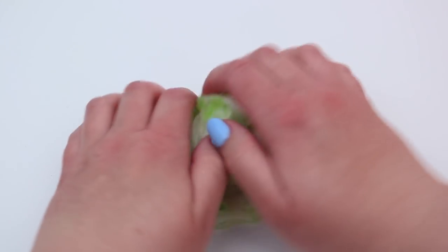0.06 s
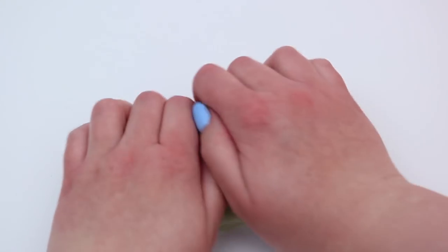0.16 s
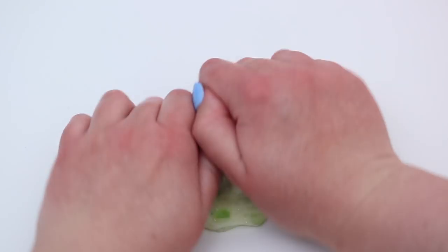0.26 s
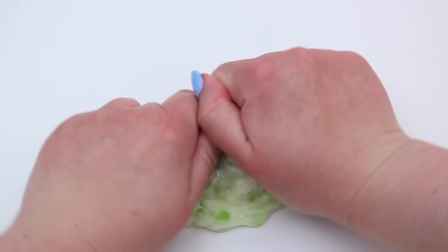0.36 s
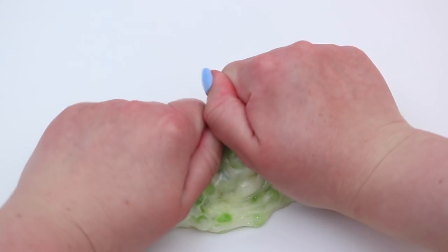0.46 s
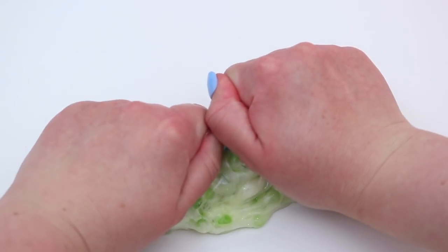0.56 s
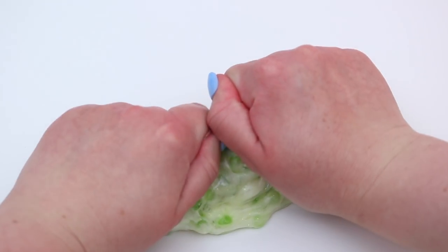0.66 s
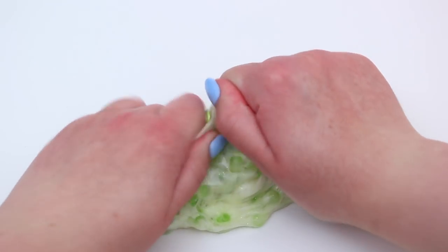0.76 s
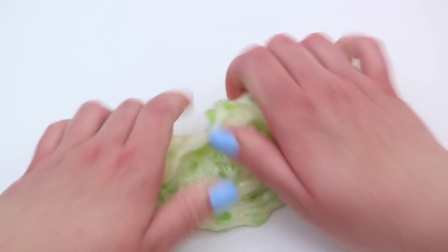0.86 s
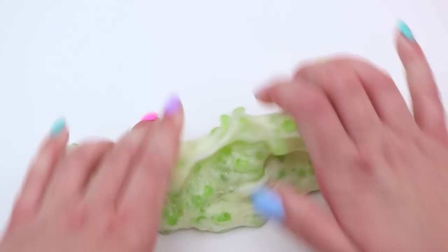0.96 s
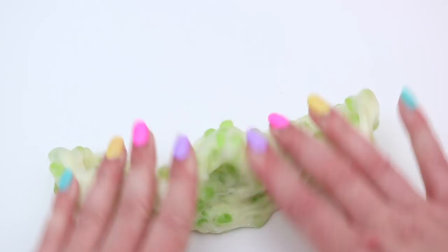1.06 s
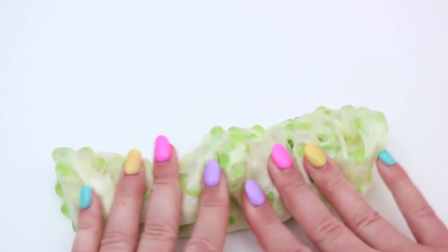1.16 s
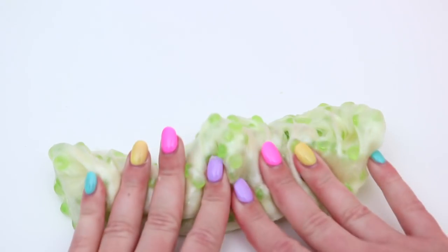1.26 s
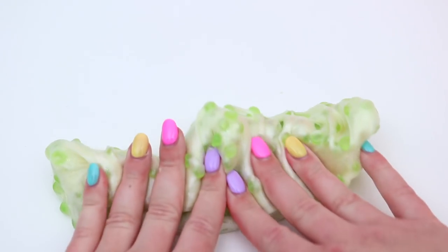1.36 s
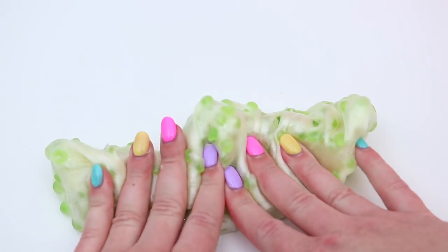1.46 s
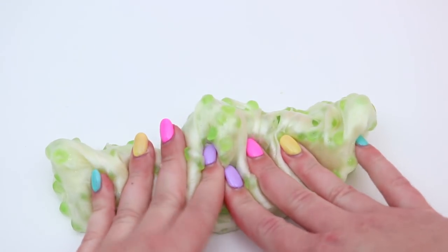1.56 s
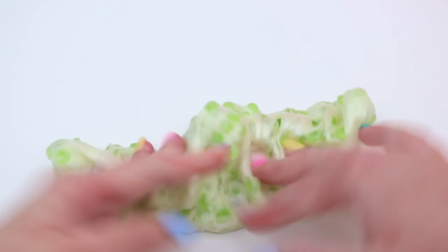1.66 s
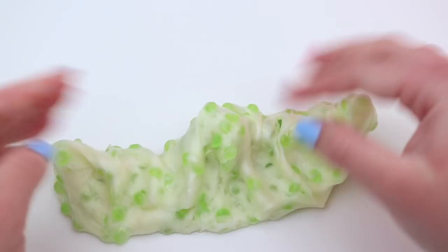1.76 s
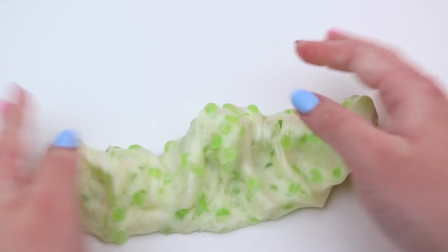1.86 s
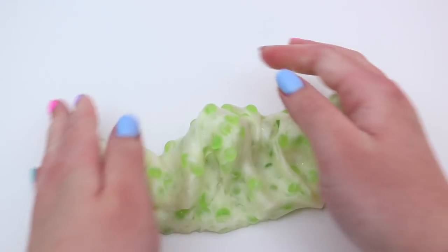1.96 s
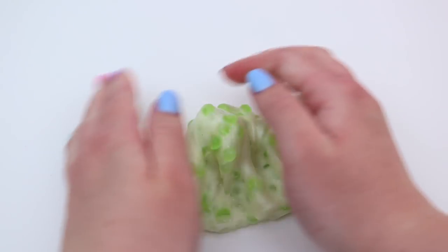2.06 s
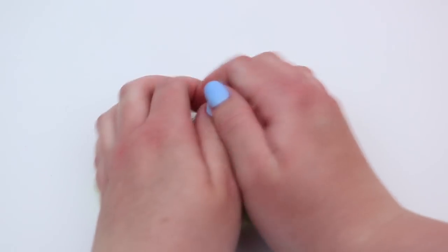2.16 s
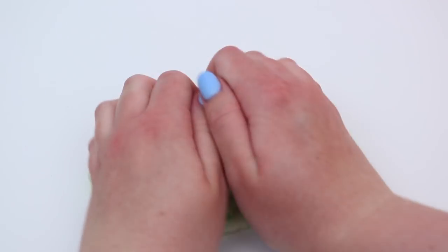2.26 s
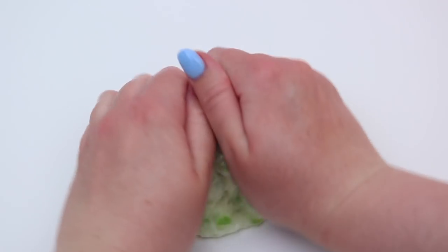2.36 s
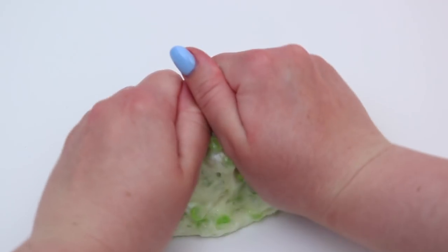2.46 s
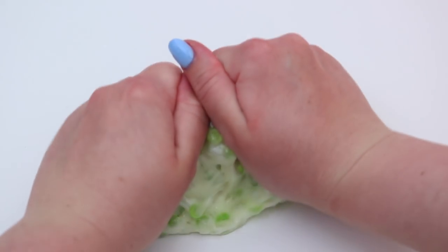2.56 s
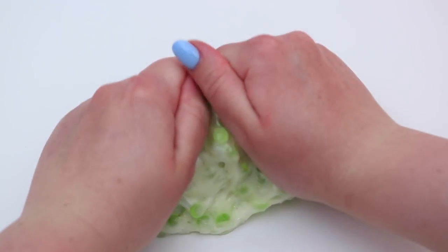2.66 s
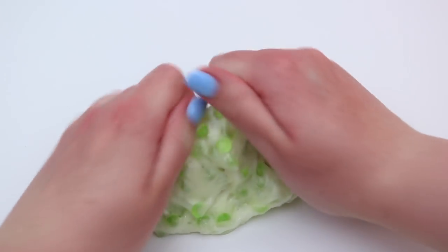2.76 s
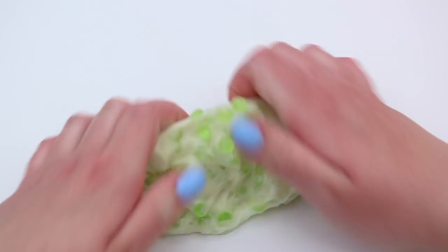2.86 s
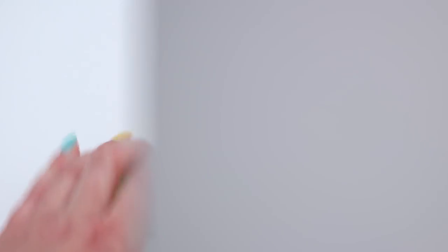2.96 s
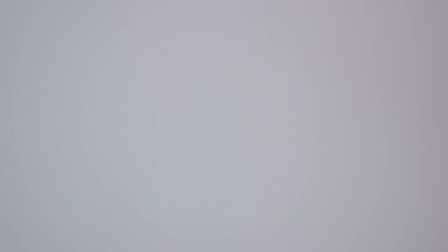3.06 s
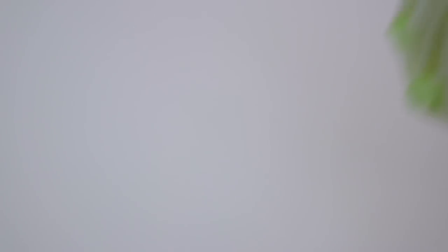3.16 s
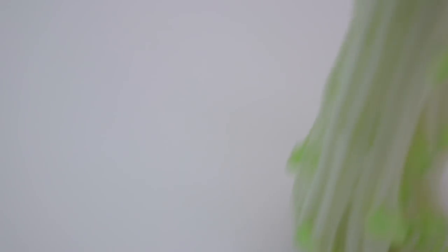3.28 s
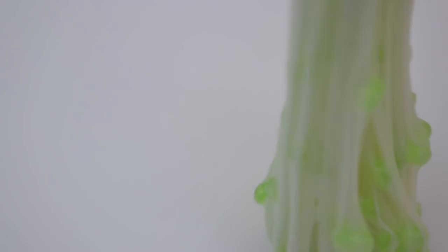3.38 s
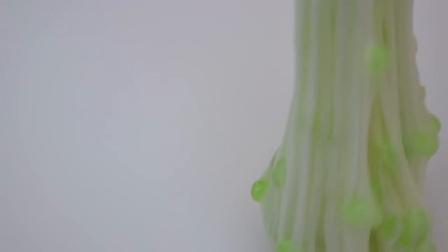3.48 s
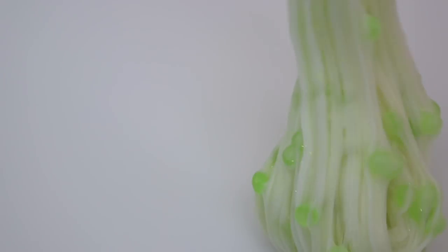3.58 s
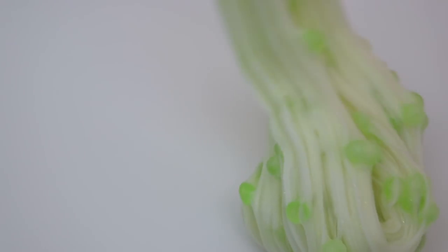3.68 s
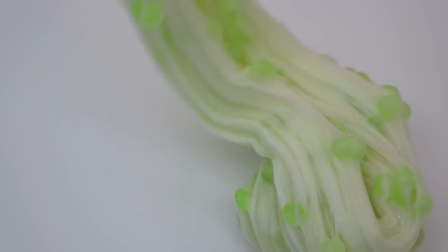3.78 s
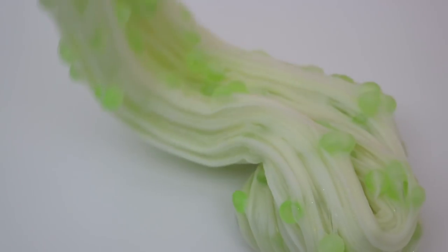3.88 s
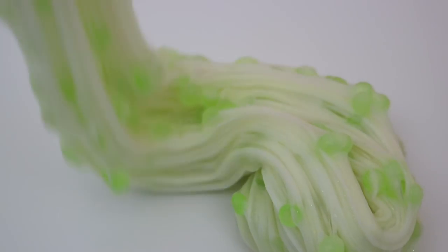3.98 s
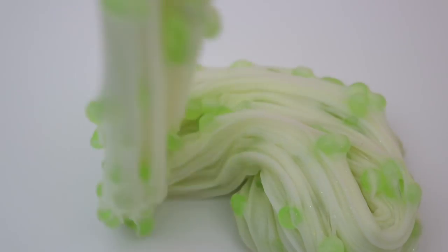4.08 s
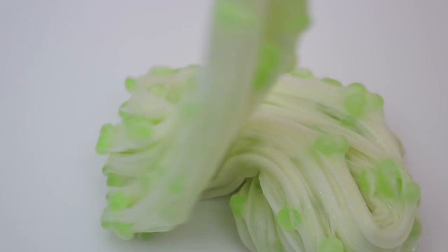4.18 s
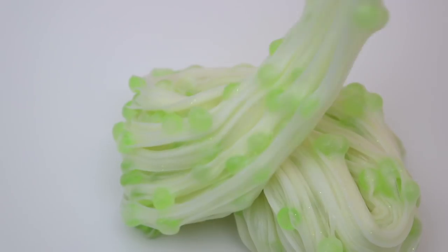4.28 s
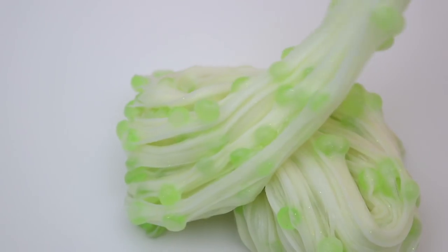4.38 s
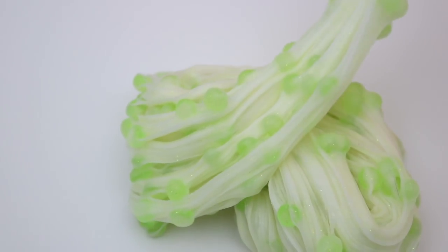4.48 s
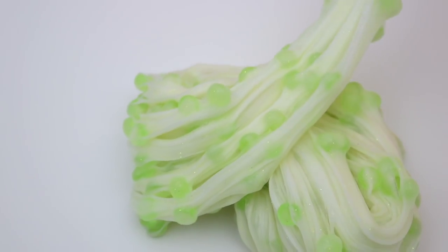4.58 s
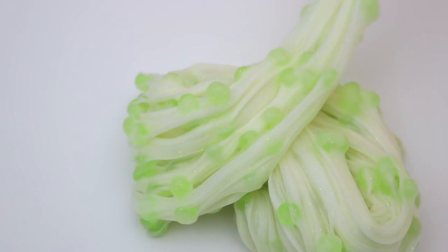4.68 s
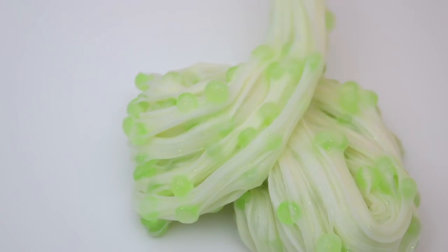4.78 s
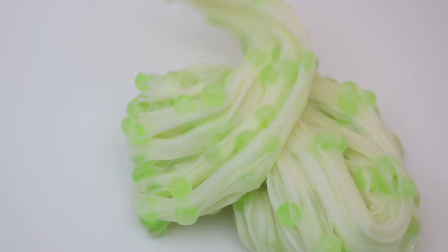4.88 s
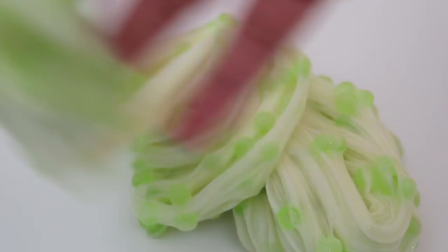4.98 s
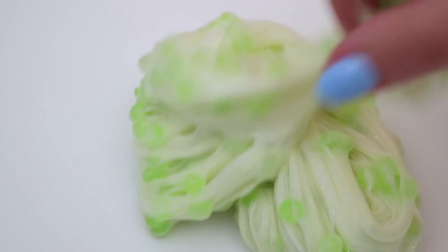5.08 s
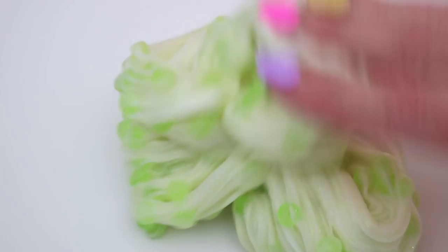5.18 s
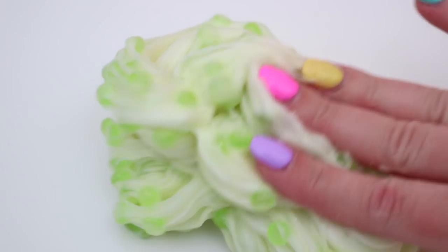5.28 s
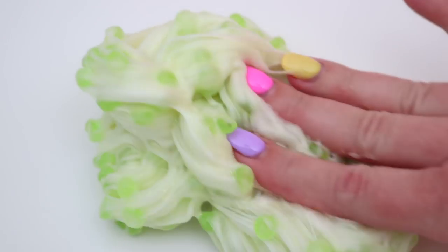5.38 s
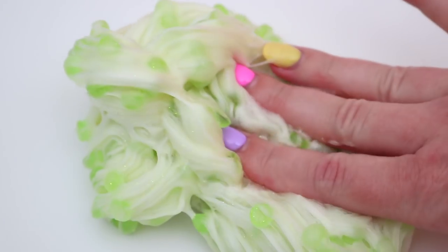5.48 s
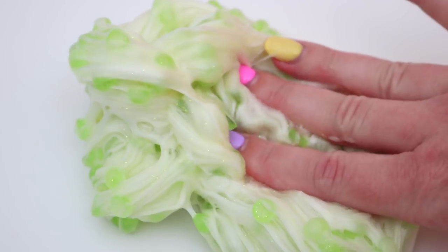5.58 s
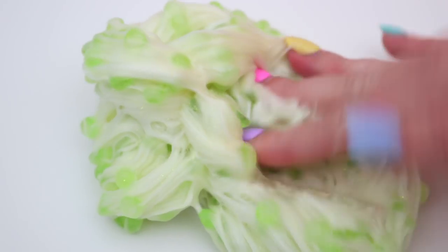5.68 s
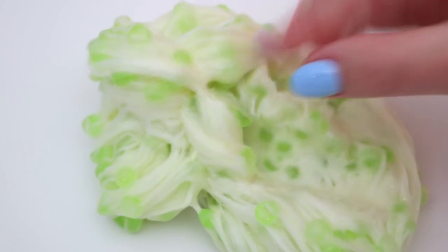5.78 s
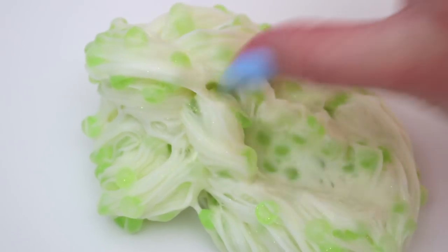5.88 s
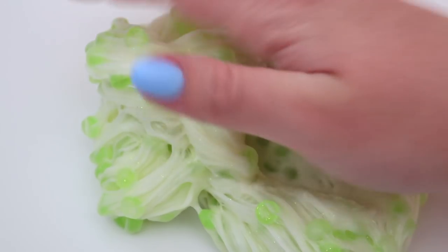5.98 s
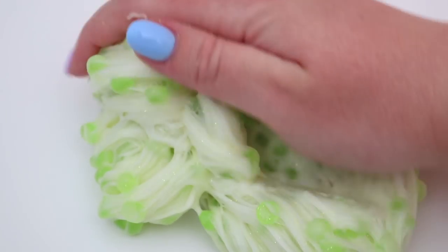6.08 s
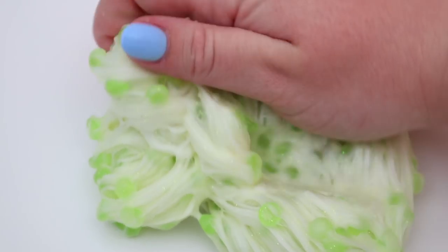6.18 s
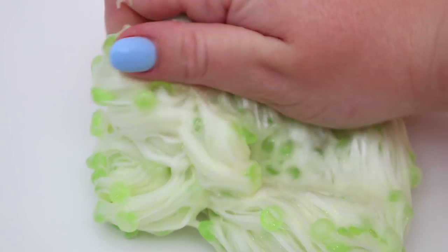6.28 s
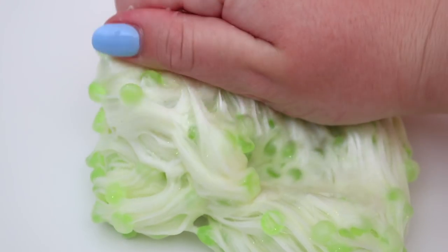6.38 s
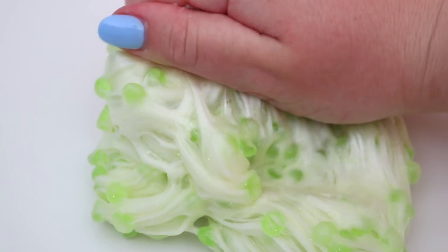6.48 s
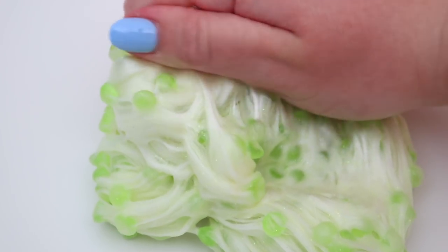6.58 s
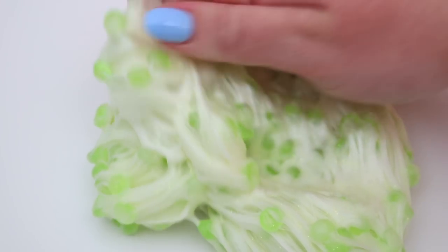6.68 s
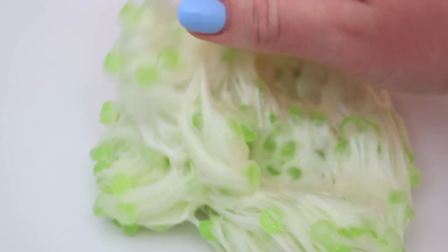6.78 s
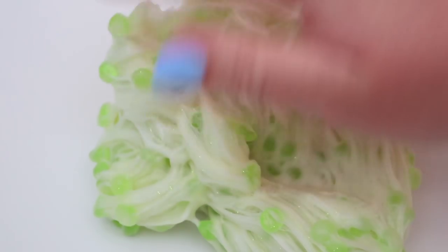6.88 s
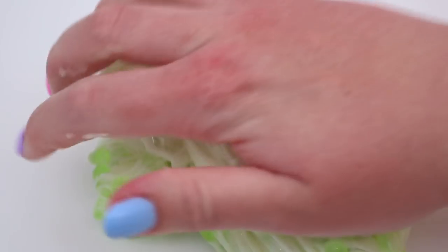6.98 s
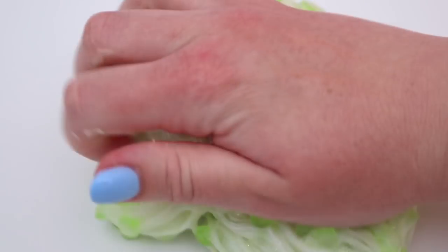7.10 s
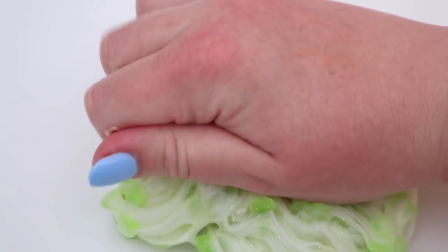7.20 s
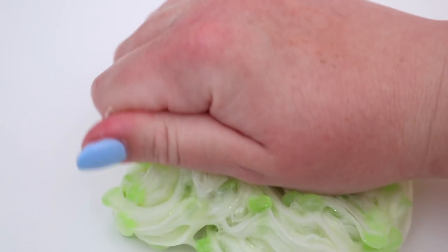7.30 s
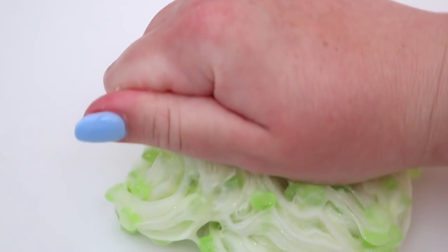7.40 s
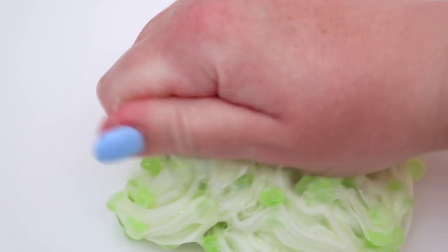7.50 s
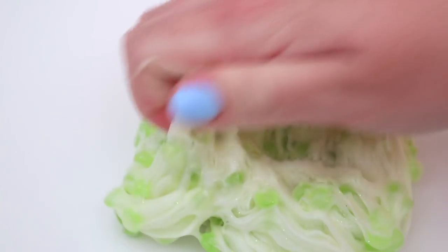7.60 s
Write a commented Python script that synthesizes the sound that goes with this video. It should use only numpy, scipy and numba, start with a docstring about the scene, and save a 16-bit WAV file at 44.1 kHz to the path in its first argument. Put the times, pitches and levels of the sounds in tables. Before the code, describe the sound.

Bead-filled slime is kneaded on a table, heard very close and dry in a small quiet room with low steady room tone. From 0.1 to 0.65 s a thick run of sharp pops and bright snaps crackles out, followed by a plop and a sticky peel with a soft table thump around 0.7-0.95 s. Fainter ticks and light rustling continue from 1.1 to 1.7 s, ending in a small peel. At 2.1 s light crackle builds to a short crisp cluster at 2.4-2.65 s, then sticky tearing until 3 s. From 3 to 5 s only sparse, faint ticks remain. Soft pops and wet plops return at 5.2-5.9 s. The loudest, densest crunch bursts at 6.2-6.6 s, with a peel and low thump after. A final squelchy, popping squeeze at 7.1-7.45 s ends in a sticky peel and deep table boom near 7.6 s.

```python
"""Hands knead bead-filled slime on a table, heard close in a small quiet room with steady room tone.
0.1-0.9 s: a thick run of pops, then a few fainter ones; 2.1-2.7 s: a short cluster; 3-5 s: sparse, faint.
5.2-5.9 s: pops return; 6.1-6.6 s: the loudest cluster; 7.1-7.5 s: one more, then a peel and a table boom.
Pops and their strong close echoes are damped-sine grains, the tearing film is dense random grains,
the pressed table top is a set of resonances; fainter echoes and a short tail follow the slime sounds."""
import sys
import numpy as np
from scipy import signal
from scipy.fft import rfft, irfft
from scipy.io import wavfile
from scipy.ndimage import uniform_filter1d, minimum_filter1d
from numba import njit

SR = 44100
rng = np.random.default_rng(int(sys.argv[2]) if len(sys.argv) > 2 else 0)


def wav_out(sig):
    """Save sig, one row per channel (or a flat mono array), as 16-bit PCM at SR to the path in sys.argv[1]."""
    wavfile.write(sys.argv[1], SR, np.round(np.clip(np.atleast_2d(sig).T, -1, 1) * 32767).astype(np.int16))


N = 336924


def undb(db):
    """dB to amplitude gain."""
    return 10 ** (np.asarray(db) / 20)


def level(x, rms_db):
    """Scale to the given rms level."""
    return x * undb(rms_db) / np.sqrt(np.mean(x ** 2))


def band(x, hz, width_hz):
    """Resonance with gain 1 at the centre."""
    b, a = signal.iirpeak(hz, hz / width_hz, fs=SR)
    return signal.lfilter(b, a, x)


def highpass(x, order, hz):
    """Butterworth bass cut."""
    return signal.sosfilt(signal.butter(order, hz, "high", fs=SR, output="sos"), x)


@njit
def grains(size, at, hz, cycles, peak, phase, rise, glide):
    """Damped sines that swell and die within the given cycles; peak is the top of each envelope."""
    out = np.zeros(size)
    for k in range(len(at)):
        length = cycles[k] * SR / hz[k]
        top = rise * length
        for i in range(min(int(length), size - at[k])):
            x = (i + 1) / top
            envelope = (x * np.exp(1 - x)) ** 2
            bend = 1 + glide[k] * i / length / 2  # pitch shifts by the share glide over the grain
            out[at[k] + i] += peak[k] * envelope * np.sin(phase[k] + 2 * np.pi * hz[k] * i / SR * bend)
    return out


def burst(s, hz, cycles, peak_db, glide=0.):
    """Grains of chance phase, started early so that they crest near the times s."""
    start_s = s - 0.079 * cycles / hz
    at = np.clip(start_s * SR, 0, N - 1).astype(np.int64)
    phase = 2 * np.pi * rng.random(len(s))
    return grains(N, at, np.clip(hz, 50, .4 * SR), cycles + 0 * hz, undb(peak_db), phase,
                  0.087, glide + 0 * hz)


def crackle(rate_hz, lo_hz, hi_hz, cycles, spread_db, bend=0.):
    """Countless grains at chance moments and pitches, a few larger; rms 1."""
    when, pitch, size, slide = rng.random((int(rate_hz * N / SR), 4)).T
    hz = lo_hz * (hi_hz / lo_hz) ** pitch
    db = np.minimum(-spread_db * np.log(1 - size), 4.25 * spread_db)
    return level(burst(when * N / SR, hz, cycles, db, bend * (2 * slide - 1)), 0)


# room tone spectrum: f/Hz, relative density/dB per Hz
AIR = [(25, -1), (60, 0.5), (121, -7.5), (187, 4.5), (330, -9.5), (746, -10.5), (979, 0), (1220, -6.5),
       (1600, -9), (2530, -27), (3600, -28), (14800, -23.5), (16500, -40)]
AIR_RMS_DB = -68.5


def air():
    """Steady room tone: noise shaped in the spectrum."""
    hz, db = np.transpose(AIR)
    f = np.maximum(np.arange(N // 2 + 1) * SR / N, 1)
    gain = undb(np.interp(np.log(f), np.log(hz), db))
    return level(irfft(rfft(rng.standard_normal(N)) * gain, N), AIR_RMS_DB)


# close echoes: delay/ms, level/dB re direct
ECHOES = [(.8, -24.5), (1.5, -11.5), (2.1, -4.5), (3.8, -22), (11.5, -27.5), (14.5, -27)]
# room tail bands: f/Hz, T60/s, level/dB (energy weighted by f)
ROOM_T60 = [(744, 0.25, -35), (2800, 0.21, -28), (9000, 0.14, -29.5)]


def reply():
    """Direct sound, close echoes smeared by rough surfaces, then a faint tail, shorter in the treble."""
    t = np.arange(SR // 4) / SR
    out = np.zeros(len(t))
    out[0] = 1
    for ms, db in ECHOES:
        smear = rng.standard_normal(len(t)) * np.exp(-np.abs(t * 1000 - ms) / 0.1)
        out += undb(db) * smear / np.sqrt(np.sum(smear ** 2))
    for hz, t60_s, db in ROOM_T60:
        decay = np.exp(-np.log(1000) * t / t60_s)
        tail = band(rng.standard_normal(len(t)), hz, 2.4 * hz) * decay * (t > .001)
        out += undb(db) * tail / np.sqrt(np.sum(tail ** 2) * hz / SR)
    return out


def room(x, spots=6, size=700):
    """Pockets burst all over the lump: each run of samples meets the echoes of a random spot."""
    spot = np.repeat(rng.integers(0, spots, N // size + 1), size)[:N]
    return sum(signal.oaconvolve(x * (spot == k), reply())[:N] for k in range(spots))


def gesture(rows, arch_db, rise_db_per_s, fall_db_per_s):
    """Arched power of crackle and table that dies away outside each gesture; overlaps add."""
    t, power = np.arange(N) / SR, 0
    for start, swell, fade, *crest_db in rows:
        corners_s = [-1, 0, swell, swell + fade, swell + fade + 1]
        corners_db = [-arch_db - rise_db_per_s, -arch_db, 0, -arch_db, -arch_db - fall_db_per_s]
        shape_db = np.interp(t - start, corners_s, corners_db)
        power = power + undb(shape_db + np.array(crest_db)[:, None]) ** 2
    return power


# weight resting on slime and table: t/s, wet rustle/dB, fine rustle/dB, table/dB, table bass/dB
LEAN = [(0, -78, -72.5, -64, -78), (.16, -61, -67.5, -65, -77), (1.05, -62.5, -62, -54.5, -70.5),
        (1.498, -72, -69, -64.5, -79), (1.9, -83, -92, -72, -75), (2.0, -71.5, -70, -63, -68),
        (2.99, -58, -59.5, -61, -75.5), (3.04, -82, -89.5, -78.5, -82.5), (5.1, -81.5, -83, -74.5, -78),
        (5.5, -57, -91, -56, -81.5), (5.66, -90, -88, -72.5, -85), (6, -71.5, -76.5, -67.5, -65.5),
        (6.65, -57, -59.5, -55.5, -74.5), (6.9, -73, -73, -67, -64), (7.1, -64.5, -77, -68, -76),
        (7.5, -61, -80, -80, -81), (7.64, -63, -66, -60, -72)]
# hands shift their weight, table booms: t/s, level/dB
BOOMS = [(.03, -59), (.96, -50), (1.27, -58), (1.779, -54.5), (5.74, -62.5), (5.9, -50), (6.69, -61),
         (6.82, -47.5), (7.16, -54.5), (7.64, -38)]
BOOM_DB_PER_S = 232  # slope on both sides
# hands press into the slime: start/s, swell/s, fade/s, wet crackle/dB, fine crackle/dB, table/dB
SQUEEZES = [(.21, 0.082, 0.21, -46.5, -48.5, -51), (.36, 0.031, 0.11, -38.5, -39, -47),
            (.53, 0.065, 0.048, -52, -48.5, -68), (1.22, 0.052, 0.087, -65.5, -74.5, -60),
            (1.36, 0.021, 0.055, -62, -66, -59), (2.085, 0.021, 0.13, -51.5, -56, -50.5),
            (2.305, 0.16, 0.1, -45.5, -49, -48), (2.495, 0.021, 0.026, -35, -45, -55.5),
            (2.585, 0.016, 0.041, -39.5, -39, -52), (4.72, 0.04, 0.027, -69, -67, -75),
            (5.27, 0.13, 0.29, -75, -76, -67.5), (6.13, 0.12, 0.067, -55, -54.5, -54),
            (6.25, 0.022, 0.081, -40, -43.5, -46), (6.34, 0.069, 0.047, -30.5, -27.5, -56),
            (6.48, 0.02, 0.04, -57, -45, -62.5), (6.555, 0.017, 0.043, -53.5, -41.5, -71),
            (7.145, 0.014, 0.034, -47.5, -47.5, -49), (7.215, 0.045, 0.1, -38.5, -37.5, -43),
            (7.297, 0.019, 0.064, -32, -34, -40), (7.39, 0.012, 0.05, -42, -43.5, -45)]
SQUEEZE_ARCH_DB, SQUEEZE_RISE_DB_PER_S, SQUEEZE_FALL_DB_PER_S = 8, 598.5, 263
# sticky skin peels off: start/s, swell/s, fade/s, wet crackle/dB, fine crackle/dB, table/dB
PEELS = [(0.799, 0.054, 0.11, -37.5, -39.5, -37.5), (1.652, 0.064, 0.082, -49.5, -45.5, -39),
         (2.78, 0.046, 0.097, -40.5, -43.5, -42), (2.9, 0.083, 0.036, -64, -54.5, -49),
         (5.72, 0.015, 0.038, -44.5, -46.5, -40), (5.81, 0.012, 0.075, -54, -47, -43),
         (6.668, 0.053, 0.12, -40, -39.5, -40.5), (7.555, 0.036, 0.13, -41.5, -43.5, -37.5)]
PEEL_ARCH_DB, PEEL_RISE_DB_PER_S, PEEL_FALL_DB_PER_S = 14.5, 381, 387
REST_WET_DB, REST_FINE_DB = -85, -90.5  # the lump settles by itself


def hands():
    """Powers of all hand moves add: (wet, fine) gains of sparse and dense crackle, table and bass in dB."""
    t = np.arange(N) / SR
    squeeze = gesture(SQUEEZES, SQUEEZE_ARCH_DB, SQUEEZE_RISE_DB_PER_S, SQUEEZE_FALL_DB_PER_S)
    peel = gesture(PEELS, PEEL_ARCH_DB, PEEL_RISE_DB_PER_S, PEEL_FALL_DB_PER_S)
    s, *columns = np.transpose(LEAN)
    lean = undb([np.interp(t, s, db) for db in columns]) ** 2
    booms = sum(undb(db - BOOM_DB_PER_S * np.abs(t - at)) ** 2 for at, db in BOOMS)
    rest = undb([[REST_WET_DB], [REST_FINE_DB]]) ** 2
    sparse = np.sqrt(squeeze[:2] + rest)
    dense = np.sqrt(peel[:2] + lean[:2])
    push_db = 10 * np.log10(squeeze[2] + peel[2] + lean[2])
    bass_db = 10 * np.log10(booms + lean[3])
    return sparse, dense, push_db, bass_db


# table top modes: f/Hz, width/Hz at damp 1, level/dB
TABLE = [(132, 27, -10), (195.5, 16, -6.5), (285, 20, 3.5), (363.9, 19, 5.5), (460, 23, -5), (505, 51, -2),
         (600, 65, -2)]


def table_modes(x, damp=1.3):
    """Modes of the table top; a pressing hand damps them, a light knock lets them ring."""
    return sum(undb(db) * band(x, hz, damp * width_hz) for hz, width_hz, db in TABLE)


# wet plops and low thuds of pops, ringing the table: t/s, level/dB, f/Hz, knock/dB re level
PLOPS_AND_THUDS = [(0.713, -29.5, 660, 21), (0.799, -40, 318, 14), (0.857, -36, 340, 4),
                   (.875, -34, 207, 2), (1.1039, -37, 418, 14), (1.685, -39.5, 353, 13.5),
                   (1.952, -51, 282, 8), (3.364, -50, 329, 8.5), (5.324, -33.5, 610, 2),
                   (5.369, -41.5, 560, 2), (5.525, -54, 310, 10), (5.566, -47, 326, 7),
                   (5.738, -39, 292, 13.5), (5.835, -39.5, 326, 17), (6.256, -30, 227, 13),
                   (7.227, -31.5, 320, 11), (7.296, -21, 474, 11)]
SAG = -0.44  # share of pitch lost over the lowest grain


def plops_and_thuds():
    """Two steady upper grains and a slightly later low one that sags in pitch."""
    s, db, hz, _ = np.transpose(PLOPS_AND_THUDS)
    low = burst(s + 0.0021, hz, 14.1, db - 1.0, SAG)
    mid = burst(s, 1.3 * hz, 14.0, db + 0.5)
    high = burst(s, 5.1 * hz, 15.6, db - 21.0)
    return low + mid + high


def table(push_db, bass_db, jolts):
    """Uneven pushes of the hands, wet plops, low thuds and the jolts of the pops ring the table top."""
    s, db, hz, knock_db = np.transpose(PLOPS_AND_THUDS)
    pushes = crackle(700, 150, 820, 9.0, 2.1, bend=0.51)  # wet blobs that slide up or down
    top = level(table_modes(pushes) + undb(-11.0) * pushes, 0)
    bass = level(band(band(rng.standard_normal(N), 61, 16), 67, 26), 0)
    knocks = burst(s, hz, 3.5, db + knock_db)
    struck = table_modes(knocks + undb(-4.0) * jolts, 0.36)
    return undb(push_db) * top + undb(bass_db) * bass + plops_and_thuds() + struck


def lumps(spread_db, size=400):
    """Threads let go in bunches: a gain that jumps about a hundred times a second."""
    steps = np.repeat(rng.standard_normal(N // size + 1), size)
    db = spread_db * uniform_filter1d(steps, size // 3)[:N]
    return level(undb(db), 0)


def ticks(rate_hz=450, spread_db=4.5, own_db=4.0):
    """Beads slip and small pockets burst singly: low and high grain together, each pair of its own colour."""
    when, size, low, high, tilt = rng.random((int(rate_hz * N / SR), 5)).T
    s = when * N / SR
    db = np.minimum(-spread_db * np.log(1 - size), 13.0)
    tilt_db = own_db * (2 * tilt - 1)
    return (level(burst(s, 1100 * 5.9 ** low, 6.5, db + tilt_db), 0),
            level(burst(s, 5500 * 2.8 ** high, 4.8, db - tilt_db), 0))


def film(sparse, dense):
    """Squeezing gives separate ticks; peeling skin tears many threads at once, a dense wet rustle."""
    low, high = ticks()
    wet = dense[0] * lumps(3.0) * crackle(5000, 870, 6000, 6.5, 5.5) + sparse[0] * low
    fine = dense[1] * lumps(0.5) * crackle(9000, 4862, 16000, 2.9, 4.8) + sparse[1] * high
    return wet + fine


# bursting pockets, some followed about 2 ms later by a strong close echo (a row of its own):
# t/s, ring f/Hz, ring level/dB, snap f/Hz, snap level/dB
POPS = [(0.083, 1600, -39, 7100, -59), (0.1823, 4690, -34, 9750, -29), (0.199, 1430, -34, 6260, -35),
        (0.225, 1350, -30.5, 6300, -41), (0.247, 2250, -16.5, 12060, -43), (0.2497, 3100, -16.5, 8500, -19),
        (0.26, 2420, -23, 7705, -19), (0.2712, 2730, -20, 7200, -20), (0.304, 1470, -25, 11800, -23),
        (0.32, 2020, -24.5, 8700, -16.5), (0.3224, 2640, -8.5, 6300, -20), (0.3627, 2630, -20, 9496, -37),
        (0.373, 3000, -14.5, 9400, -12), (0.3881, 1880, -12, 7800, -5.5), (0.3949, 2520, -15, 9500, -9),
        (0.401, 3800, -12.5, 10300, -17), (0.412, 3500, -23, 10300, -0.5), (0.431, 3300, -39, 7940, -17),
        (0.442, 3740, -41, 11000, -14), (0.447, 1570, -13.5, 9365, -23), (0.449, 2460, -4.5, 7460, -16),
        (0.459, 2400, -31, 6950, -20), (.53, 2494, -24.5, 12000, -18), (0.538, 4100, -30, 8740, -13),
        (0.5435, 4620, -29, 11300, -5.5), (.557, 2540, -26, 6500, -27), (0.581, 1480, -22, 7080, -26),
        (0.5907, 3450, -20.5, 10000, -14.5), (0.619, 3720, -40, 11120, -1.5),
        (0.6314, 4030, -32, 8910, -0.5), (0.775, 3870, -34, 7740, -32), (0.797, 1510, -52, 12500, -35),
        (.848, 2150, -21, 10700, -31), (.879, 4070, -24, 7500, -24), (0.906, 1420, -30, 10800, -17),
        (1.163, 1350, -62, 11600, -30), (1.1981, 3560, -32.5, 11600, -25), (1.208, 2430, -35.5, 11900, -50),
        (1.254, 1350, -56, 11700, -34), (1.272, 1750, -45, 12100, -28.5), (1.279, 1350, -36, 7000, -60),
        (1.3076, 2450, -46, 9500, -40), (1.3579, 2580, -30.5, 10800, -13), (1.379, 1680, -50, 12400, -26),
        (1.388, 1500, -41, 10000, -32), (1.405, 1800, -43, 11000, -33), (1.4193, 1800, -54, 11700, -28.5),
        (1.4918, 2940, -35.5, 6700, -44), (1.538, 2020, -45.5, 10200, -42),
        (1.622, 2460, -45.5, 10500, -34.5), (2.0805, 3000, -26, 12100, -21),
        (2.112, 3280, -27.5, 8570, -31), (2.151, 1730, -38, 6810, -37), (2.195, 3560, -39, 10100, -36),
        (2.2865, 2490, -39, 7030, -42), (2.3036, 2940, -31, 10500, -19), (2.3184, 3370, -34, 8670, -33),
        (2.332, 1490, -37, 12260, -23), (2.362, 1590, -33.5, 9880, -41), (2.4, 1990, -24.5, 8900, -32),
        (2.419, 2070, -16.5, 11440, -14.5), (2.434, 3040, -17, 8500, -26), (2.472, 2220, -33, 6500, -30),
        (2.4919, 1650, -14, 8160, -6), (2.4947, 1670, -7, 6600, -20), (2.508, 1660, -19, 11040, -15),
        (2.524, 2810, -17, 9900, -11), (2.585, 3290, -56.5, 11900, -12.5), (2.5903, 4000, -33, 12900, -14),
        (2.599, 4000, -26, 10500, -15), (2.618, 2460, -13, 12700, -10), (2.6244, 5100, -11, 9100, -20),
        (2.6312, 3870, -10.5, 8700, -9), (3.3, 3700, -38.5, 7260, -48.5), (3.378, 3430, -53.5, 6050, -69.5),
        (3.453, 3730, -59.5, 6020, -57), (3.701, 2470, -58.5, 8500, -47),
        (3.796, 3320, -63.5, 11230, -44.5), (3.823, 3000, -53.5, 6700, -56), (4.011, 3130, -50, 8300, -68),
        (4.1654, 3120, -50.5, 8840, -57), (4.32, 3480, -59.5, 6450, -54.5), (4.618, 3000, -62, 7000, -54.5),
        (4.724, 3380, -46, 9940, -44), (4.755, 4520, -50, 7500, -44), (4.7835, 4710, -47, 7830, -38.5),
        (4.937, 1250, -61, 11000, -48), (5.0452, 2270, -44.5, 6450, -44), (5.1105, 2860, -60.5, 10030, -47),
        (5.2, 3500, -55, 10000, -41), (5.2521, 2960, -40, 7000, -47), (5.256, 3500, -46, 13000, -39),
        (5.2741, 3030, -34.5, 8200, -44), (5.2976, 4330, -40, 6400, -45), (5.3045, 4500, -50, 11000, -45),
        (5.3256, 2640, -21, 6430, -30), (5.3291, 3500, -32, 13000, -26.5), (5.345, 2510, -46.5, 8300, -29),
        (5.371, 3300, -26.5, 7000, -41), (5.419, 2880, -30.5, 8100, -33.5), (5.4226, 3300, -40, 11500, -32),
        (5.449, 2000, -50, 10000, -35), (5.4578, 2850, -29.5, 7900, -20), (5.507, 4000, -40, 9000, -56),
        (5.528, 1600, -40, 6150, -51), (5.5532, 3630, -39, 8600, -37), (5.564, 2320, -33, 8600, -29),
        (5.574, 3030, -48, 9000, -37), (5.5946, 3200, -44, 10100, -34), (5.6446, 3400, -58, 8550, -38.5),
        (5.747, 3340, -26, 8400, -27), (5.7763, 3100, -30, 10800, -29), (5.8132, 4030, -25, 9000, -19.5),
        (6.1049, 1580, -41.5, 10600, -30.5), (6.126, 2000, -28, 10740, -25),
        (6.1873, 2760, -27, 10760, -28), (6.21, 2240, -22, 9950, -39), (6.24, 3850, -16, 8500, -31),
        (6.25, 2700, -7, 9500, -17.5), (6.29, 3640, -20.5, 9280, -19), (6.3247, 4020, -12, 7500, -26),
        (6.3367, 3160, 2, 7400, -19), (6.3424, 2010, -17, 7760, -9), (6.352, 3960, -14, 9000, -32),
        (6.3735, 4740, -8.5, 7030, -17), (6.379, 2780, -12, 8700, -6), (6.39, 2200, -10.5, 10900, -5),
        (6.402, 3000, -5, 9400, 9), (6.406, 2250, -5.5, 9000, -1), (6.4078, 1580, -4, 9350, 0),
        (6.41, 4500, -4, 10900, -12), (6.4173, 4200, -20, 10100, 12), (6.4354, 1830, -8, 10400, 6),
        (6.4496, 2250, -10, 10200, -8), (6.4673, 3180, -8.5, 10000, 6), (6.494, 1350, -22, 13250, -10),
        (6.511, 4520, -49, 10600, -16), (6.5446, 4670, -37, 11100, -5), (6.555, 3980, -1, 10800, 2.5),
        (6.6345, 4580, -27, 7610, -47), (6.7225, 2150, -18, 6600, -40), (6.747, 5000, -19, 7000, -32),
        (6.791, 1080, -30, 6000, -27), (6.804, 3200, -26.5, 6930, -30), (6.964, 5000, -62.5, 12030, -48.5),
        (7.04, 2560, -41.5, 9000, -42.5), (7.138, 1160, -33, 7060, -34), (7.1696, 3640, -23, 8700, -23),
        (7.2133, 3330, -10.5, 8400, -10.5), (7.2503, 5100, -23, 8950, -23),
        (7.2705, 2040, -19.5, 7600, -19), (7.294, 3140, -9, 5530, -1.5), (7.2991, 3420, -19, 10700, -3.5),
        (7.323, 4550, -21, 9000, 2.5), (7.3261, 2750, -11, 11600, -2), (7.3499, 3200, -15.5, 7300, -10),
        (7.3625, 3030, -17, 8900, -13), (7.366, 3400, -17, 10500, -10), (7.39, 3560, -19, 10500, -6.5),
        (7.394, 4800, -21, 8500, -16), (7.3985, 2650, -16, 10300, -11), (7.428, 3670, -13.5, 13400, 1),
        (7.482, 2245, -37, 13000, -26)]


def pops():
    """A burst pocket rings briefly as its skin snaps; a strong close echo is built of the same grains."""
    s, ring_hz, ring_db, snap_hz, snap_db = np.transpose(POPS)
    ring = burst(s, ring_hz, 6.13, ring_db)
    snap = burst(s, snap_hz, 9.55, snap_db)
    thud = burst(s, ring_hz / 3.45, 4.06, ring_db - 12.0)  # the wall falls in
    tear = burst(s, np.sqrt(ring_hz * snap_hz), 4.0, (ring_db + snap_db) / 2 - 5.0)
    return ring + snap + thud + tear


# hollows between hands and table: f/Hz, width/Hz, level/dB
CUPPED = [(1537, 130, -6), (2460, 480, -7.5), (3724, 490, -0.5)]


def scene():
    """Slime in the room, over table and room tone."""
    sparse, dense, push_db, bass_db = hands()
    bursts = pops()
    slime = highpass(bursts + film(sparse, dense), 3, 220)  # sources this small send out no bass
    slime = slime + sum(undb(db) * band(slime, hz, width_hz) for hz, width_hz, db in CUPPED)
    return (room(slime) + table(push_db, bass_db, bursts) + air())[None]


TOP_HZ = 16200


def record(dry):
    """A fast limiter holds the loudest pops; rumble and top are cut."""
    peak = -minimum_filter1d(-np.abs(dry), size=45)
    gain = uniform_filter1d(np.minimum(1, .9 / (peak + 1e-9)), size=45)
    clean = highpass(dry * gain, 2, 48)
    return signal.sosfilt(signal.ellip(10, .2, 90, TOP_HZ, fs=SR, output="sos"), clean)


dry = scene()
out = record(dry)
wav_out(out)
```